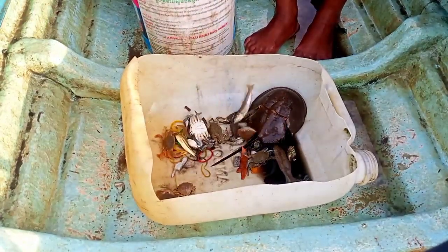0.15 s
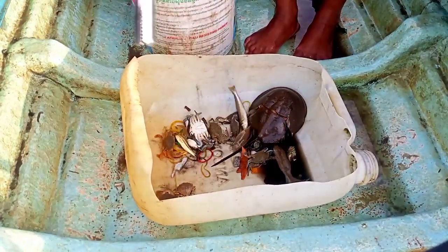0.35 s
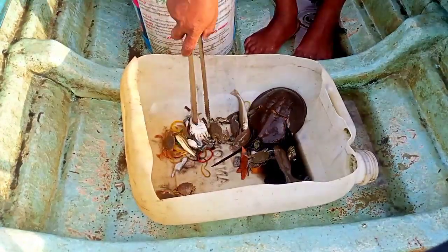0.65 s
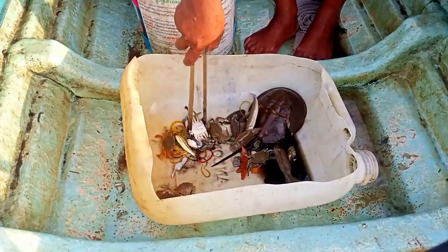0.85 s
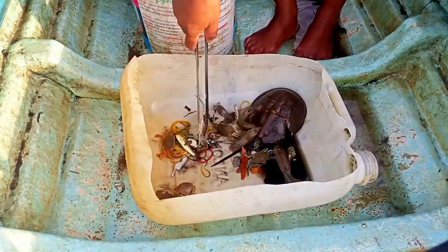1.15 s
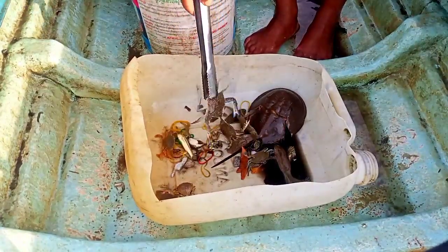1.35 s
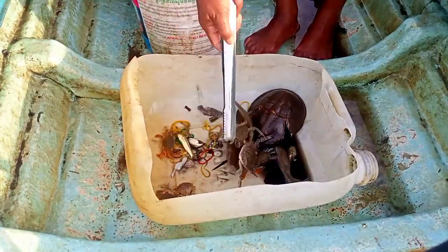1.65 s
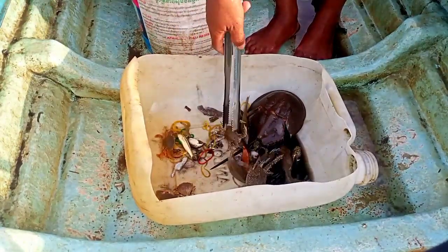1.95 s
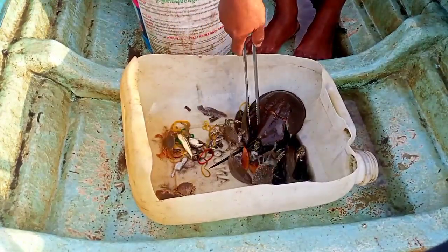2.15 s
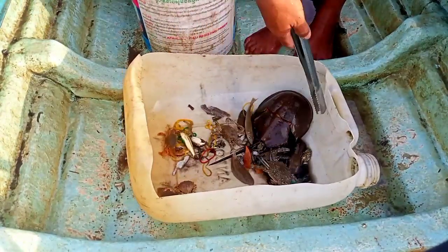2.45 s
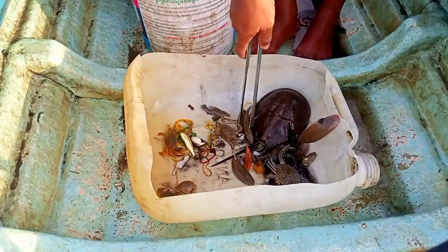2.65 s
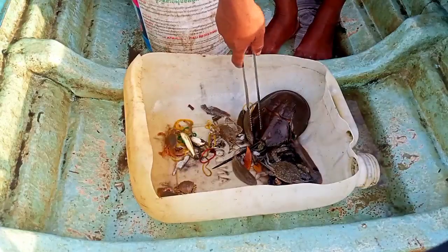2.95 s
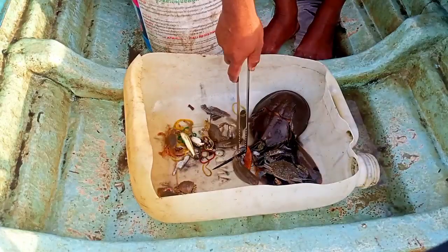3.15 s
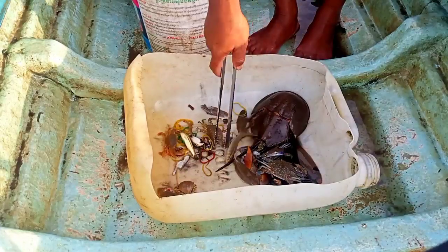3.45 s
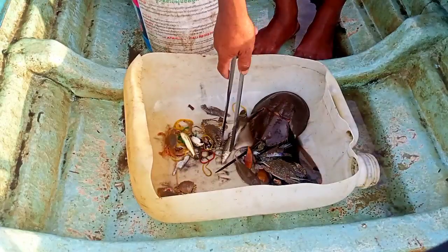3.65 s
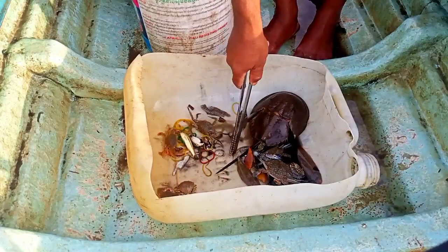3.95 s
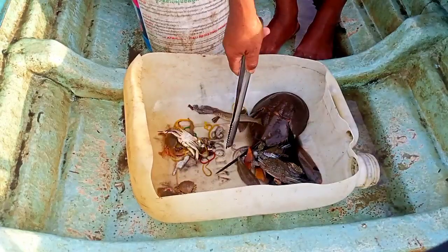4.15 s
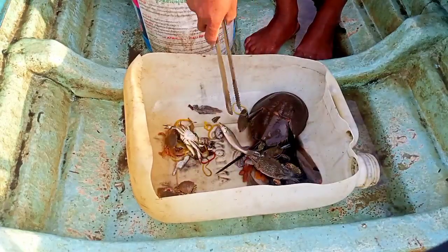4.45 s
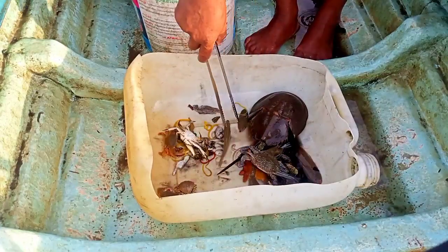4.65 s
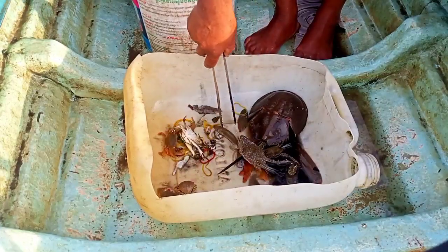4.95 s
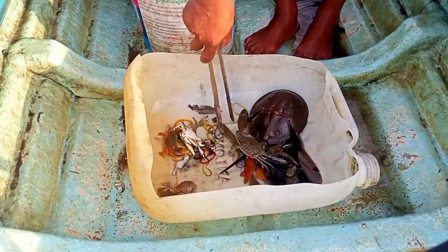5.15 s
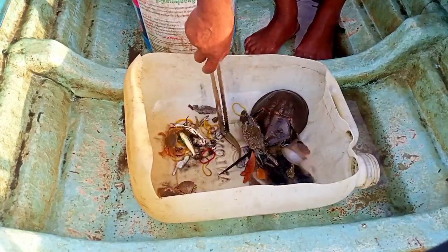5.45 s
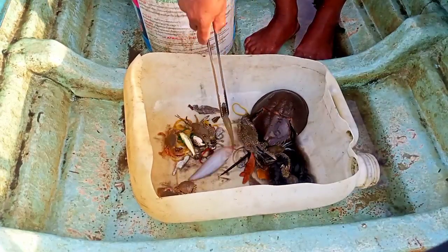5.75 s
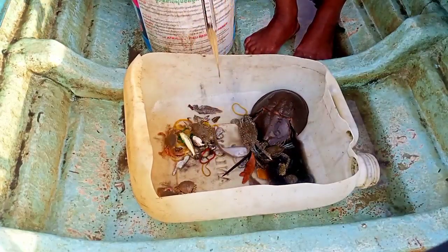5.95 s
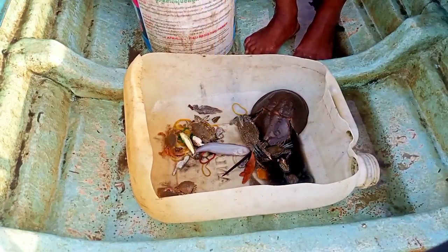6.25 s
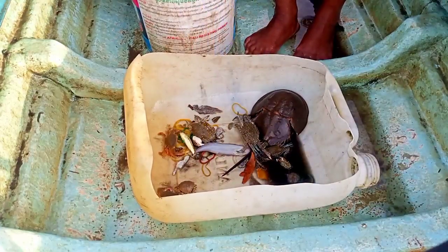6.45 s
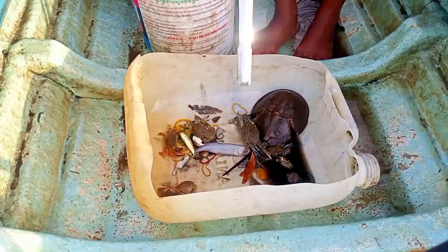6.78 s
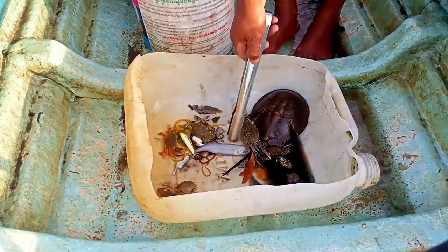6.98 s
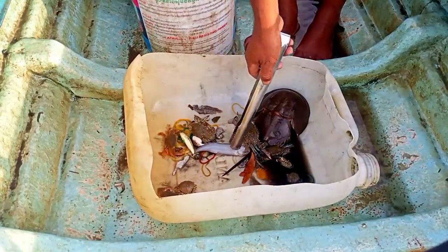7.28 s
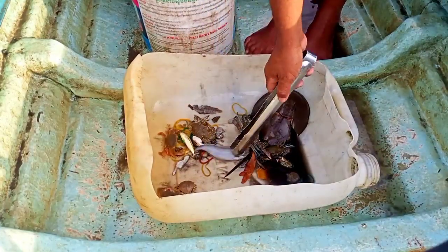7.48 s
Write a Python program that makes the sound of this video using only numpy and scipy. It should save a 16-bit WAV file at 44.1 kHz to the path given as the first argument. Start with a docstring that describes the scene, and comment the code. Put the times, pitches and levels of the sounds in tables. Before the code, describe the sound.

Close, uneven clatter of a catch being pushed around a plastic tub aboard a small boat. Shells knock against the walls and floor, the heaviest hits giving a brief hollow boom, while claws tick and scrape and steel tongs close with sharp clicks. Low wind rumble and a few dull bumps hit the microphone over a faint wash of water. The last knocks are lighter and sparser.

```python
"""Sorting a catch on a small boat

Metal tongs sort shells, crabs and fish in a cut-open plastic tub on the floor of a boat.
Each knock is a short rattle of tiny hits that rings the tub; the heaviest make the air in it boom.
In between, the catch scrapes over the plastic, small shells click and the steel tongs snap shut.
Wind hits the microphone in low thumps, water washes faintly along the hull, and dull bumps sound."""
import sys
import numpy as np
from scipy import signal
from scipy.fft import rfft, irfft, next_fast_len
from scipy.io import wavfile
from scipy.ndimage import uniform_filter1d

SR = 44100
rng = np.random.default_rng(int(sys.argv[2]) if len(sys.argv) > 2 else 0)


def unload_audio(sound):
    """Save the sound as a 16-bit wav file, at the path given as the first command line argument."""
    columns = np.transpose(np.atleast_2d(sound))
    # keep every value between -1 and 1, then stretch to whole-number steps
    steps = np.round(np.clip(columns, -1, 1) * 32767)
    wavfile.write(sys.argv[1], SR, steps.astype(np.int16))


N = 336042


def gain(db):
    """Turn decibels into a number to multiply by."""
    return 10 ** (np.asarray(db) / 20)


def unit_level(x):
    """Scale a sound to an average (rms) level of 1."""
    return x / np.sqrt(np.mean(x ** 2))


def set_peak(x, db):
    """Scale a sound so that its peak is at db."""
    return x * gain(db) / np.max(np.abs(x))


def curves(table):
    """Join the rows of a time table with straight lines, one curve per column."""
    times, *columns = np.transpose(table)
    return [np.interp(np.arange(N) / SR, times, column) for column in columns]


def keep_band(x, kind, hz, order=4):
    """Keep the "low", "high" or middle "band" pitches; a higher order cuts more sharply."""
    return signal.sosfilt(signal.butter(order, hz, kind, fs=SR, output="sos"), x)


def colour(x, spectrum):
    """Turn pitches up or down by rows of (pitch_hz, level_db)."""
    hz, db = np.transpose(spectrum)
    size = next_fast_len(len(x))
    bin_hz = np.maximum(np.arange(size // 2 + 1) * SR / size, 1)
    bin_db = np.interp(np.log(bin_hz), np.log(hz), db, left=-90, right=-90)
    return irfft(rfft(x, size) * gain(bin_db), size)[:len(x)]


def wander(per_s):
    """A smooth random curve that heads for a new value per_s times a second."""
    hold = int(SR / per_s)
    steps = np.repeat(rng.standard_normal(N // hold + 1), hold)
    return unit_level(uniform_filter1d(uniform_filter1d(steps, hold), hold)[:N])


def tiny_hits(size, per_s, spread_db):
    """Tiny pushes and pulls of uneven strength at random moments."""
    when, side, strength = rng.random((3, size))
    return (when < per_s / SR) * np.sign(side - .5) * gain(-spread_db * np.log(1 - .995 * strength))


def ring(tones, detune, extra_db, t):
    """The tones of a struck object; each falls by 60 dB in its ring_s."""
    hz, db, ring_s = np.transpose(tones)[:, :, None]
    phase = 2 * np.pi * hz * (1 + detune[:, None]) * t
    fade = np.exp(-np.log(1000) * t / np.maximum(ring_s, .01))
    return np.sum(gain(db + extra_db[:, None]) * fade * np.sin(phase), axis=0)


# Tones of the tub's floor, before the catch muffles them: pitch_hz, level_db, ring_s
FLOOR_TONES = [(623.4, 1, 0.27), (641.4, 6, 0.17), (789, 1.5, 0.093)]


def tub_floor(t):
    """The floor rings when hit at one spot; the load shifts and muffles its tones."""
    detune, scatter = rng.standard_normal((2, len(FLOOR_TONES)))
    return np.exp(-t / .013) * ring(FLOOR_TONES, 0.032 * detune, 3.1 * scatter, t)


# Tones of the tub's walls, before the catch muffles them: pitch_hz, level_db, ring_s
WALL_TONES = [(879, -4.5, 0.29), (1030, 9, 0.7), (1170, 4, 0.16), (1400, 6, 0.19), (1600, 6.5, 0.087),
              (1800, 7, 0.21), (2000, 10, 0.067), (2277, 6.5, 0.084), (2545, 10, 0.045), (2900, 6.5, 0.041)]
# Bright crackle of hard edges, as coloured by the microphone: pitch_hz, level_db
CRACK_COLOUR = [(2500, 4), (3500, 4.5), (4500, -5.5), (5600, -10), (7300, -10), (8000, 0.5), (9100, -4),
                (9800, -12), (12100, -18), (15000, -19), (15800, -10), (16200, -31)]
# How hard the catch is dragged: time_s, level_db, grit_db (added to level_db)
DRAGGING = [(0.0, -53.5, -7), (0.15, -59, -8), (0.74, -72.5, -7), (0.91, -56.5, -14), (1.29, -44.5, -5),
            (1.66, -65.5, 0), (1.93, -46, -9), (2.63, -46, -20), (2.97, -58, -8.5), (4.05, -50.5, -7.5),
            (4.18, -53.5, -4.5), (4.37, -53.5, -35), (4.58, -59.5, -7), (5.14, -44.5, -10.5),
            (5.3, -53.5, -12.5), (5.82, -48, -9.5), (6.47, -68.5, -10.5), (7.62, -62, -16)]


def scrape():
    """Shells slip over the plastic in uneven spurts; their wet weight deadens the tub."""
    level_db, grit_db = curves(DRAGGING)
    t = np.arange(SR // 20) / SR
    # hard dragging jerks, light stirring is more even
    spurts = gain(np.clip(.2 * (level_db + 70), 2, 4) * wander(45))
    slips = unit_level(tiny_hits(N, per_s=2500, spread_db=2) * spurts) * gain(level_db)
    push = keep_band(slips, "low", 3800)
    muffle = np.exp(-t / 0.0027)
    boom = unit_level(muffle * tub_floor(t)) / np.sqrt(len(t))
    tub = signal.oaconvolve(push, gain(-11) * boom)[:N]
    # the drag moves around, so now one wall tone sings out, now another
    for tone in WALL_TONES:
        wall = muffle * ring([tone], np.zeros(1), np.full(1, -26.), t)
        tub += signal.oaconvolve(push * gain(4.16 * wander(14)), wall)[:N]
    # claws and legs tick, each size at its own pitch
    ticks = np.zeros(N)
    tick_shape = np.minimum(t / 0.00054, 1) * np.exp(-t / 0.0025)
    for hz in np.geomspace(3000, 14000, num=10):
        claw = keep_band(rng.standard_normal(len(t)), "band", (hz / 1.04, hz * 1.04), order=1)
        ticks += signal.oaconvolve(tiny_hits(N, per_s=50, spread_db=3.6), claw * tick_shape)[:N]
    wet_hiss = gain(-8) * rng.standard_normal(N)
    grit = colour(unit_level(ticks) + wet_hiss, CRACK_COLOUR) * spurts
    return keep_band(tub, "high", 260, order=2) + unit_level(grit) * gain(level_db + grit_db)


# Wind pressure on the microphone between strong swirls: time_s, level_db
WIND_PRESSURE = [(0.0, -53.5), (0.95, -45), (1.04, -50.5), (2.4, -58), (2.55, -43.5), (3.71, -49),
                 (4.29, -36), (4.63, -52.5), (5.5, -56), (5.82, -45), (6.18, -43), (6.32, -51),
                 (7.17, -60.5), (7.62, -59)]
# The deep sound of swirling air: pitch_hz, level_db
RUMBLE_COLOUR = [(15, -14), (25, -11.5), (71, 1), (134, 0), (168, -4), (211, -12.5), (394, -31),
                 (470, -71.5), (500, -31), (650, -45.5), (1100, -120)]
# Single low thumps, mostly wind; one is the thud of a knock: middle_s, level_db, pitch_hz
LOW_THUMPS = [(0.206, -26.5, 93), (0.426, -34.5, 88), (0.819, -28, 129), (1.328, -28.5, 217),
              (1.429, -28.5, 79), (1.521, -33, 118), (1.68, -30.5, 182), (1.767, -29, 156),
              (1.937, -24.5, 131), (2.355, -24.5, 129), (2.407, -26.5, 121), (2.9, -30.5, 99),
              (2.99, -23.5, 131), (3.031, -29, 111), (3.934, -32, 105), (3.977, -28.5, 148),
              (4.135, -26.5, 118), (4.17, -22, 131), (4.194, -16, 134), (4.224, -22.5, 133),
              (4.259, -14, 180), (4.299, -17, 135), (4.407, -18, 149), (4.569, -29.5, 102),
              (4.906, -23.5, 123), (4.94, -19.5, 102), (4.98, -26, 122), (5.034, -16, 111),
              (5.163, -24, 131), (5.279, -27, 86.5), (5.318, -31.5, 95), (5.4, -27.5, 125),
              (5.456, -27, 129), (5.486, -29, 128), (5.544, -16, 114), (5.674, -21.5, 94),
              (5.711, -27, 141), (6.019, -22.5, 99), (6.169, -25.5, 98), (6.227, -29, 110),
              (7.354, -26.5, 88), (7.61, -27.5, 100)]


def wind():
    """Swirling air rumbles on the microphone; the rumble swells around each low thump."""
    rumble = colour(tiny_hits(N, per_s=200, spread_db=3), RUMBLE_COLOUR)
    power = uniform_filter1d(uniform_filter1d(rumble ** 2, size=2000), size=2000)
    even_rumble = rumble / np.sqrt(power + 1e-18)
    lead = SR // 5
    t = np.arange(-lead, lead) / SR
    thumps, stirred_power = np.zeros((2, N + len(t)))
    rise_s, fade_s = 0.027, 0.032
    stir = np.exp(np.where(t < 0, t / rise_s, -t / fade_s))
    for middle_s, db, hz in LOW_THUMPS:
        shape = np.exp(-(t * hz / 0.73) ** 2)  # about one and a half waves long
        i = int(middle_s * SR)
        thumps[i:i + len(t)] += gain(db) * shape * np.cos(2 * np.pi * (hz * t + rng.random()))
        stirred_power[i:i + len(t)] += (gain(db - 7.5) * stir) ** 2
    heard = slice(lead, lead + N)
    breeze = gain(curves(WIND_PRESSURE)[0] + 3 * wander(14))
    pressure = np.sqrt(breeze ** 2 + stirred_power[heard])
    return keep_band(thumps[heard] + even_rumble * pressure, "high", 52)


# Faint wash of water, with the microphone's steady high hiss: pitch_hz, level_db
WASH_AND_HISS = [(35, 0), (60, -0.5), (160, 23), (458, -0.5), (607, 20), (698, -7), (1310, -15.5),
                 (1950, -13.5), (2900, -9), (5720, -19.5), (8510, -24), (10000, -30.5), (16000, -23)]


def water_and_hiss():
    """Water washes faintly and the microphone hisses; low and high parts swell separately."""
    wash = np.zeros(N)
    for centre_hz in 90 * 2. ** np.arange(8):
        band = [(hz, db - 12 * np.log2(hz / centre_hz) ** 2) for hz, db in WASH_AND_HISS]
        wash += colour(rng.standard_normal(N), band) * gain(2.5 * wander(9))
    return unit_level(wash) * gain(-63)


def tub_walls(wall_hz, t):
    """The walls ring at one spot; the wet load muffles them and pulls the nearest tone to wall_hz."""
    hz = np.array(WALL_TONES)[:, 0]
    drift, scatter = rng.standard_normal((2, len(hz)))
    gap = np.log(hz / wall_hz)
    nearest = np.abs(gap) == np.abs(gap).min()
    detune = np.where(nearest, wall_hz / hz - 1, 0.058 * drift)
    # tones near wall_hz are strong; a small hard hit barely rings those far below
    extra_db = 2.5 * scatter + 4 * np.exp(-(gap / 0.36) ** 2) + 6 * np.minimum(gap, 0)
    return np.exp(-t / .0038) * ring(WALL_TONES, detune, extra_db, t)


def skid(hits, make_ring, spots=3, stay_s=.007):
    """The hits skid between a few spots, and each spot rings in its own way."""
    stay = int(stay_s * SR)
    spot = np.repeat(rng.integers(0, spots, len(hits) // stay + 1), stay)[:len(hits)]
    return sum(signal.fftconvolve(hits * (spot == k), make_ring())[:len(hits)] for k in range(spots))


# Knocks on the tub: start_s, wall_db, floor_db, wall_hz, crack_db, fade_s
TUB_KNOCKS = [(0.045, -23, -53, 2380, -39, 0.042), (0.08, -18, -13, 790, -54, 0.0062),
              (0.114, -15.5, -24, 830, -61, 0.0023), (0.329, -32, -40.5, 1800, -61, 0.0065),
              (0.371, -33, -62, 2900, -40, 0.0086), (0.417, -31.5, -54, 2000, -58, 0.023),
              (0.618, -30, -63, 2620, -70, 0.0079), (0.737, -17, -22, 1054, -36, 0.023),
              (0.788, -21.5, -26.5, 1020, -47, 0.034), (0.815, -26.5, -25.5, 1400, -50, 0.032),
              (0.87, -20.5, -50, 880, -43, 0.0095), (0.923, -21, -18, 1400, -47, 0.014),
              (1.039, -39, -27, 2210, -35, 0.026), (1.07, -36, -32, 3550, -37, 0.014),
              (1.096, -24, -48, 2240, -30.5, 0.013), (1.179, -40, -43, 2240, -58, 0.0092),
              (1.248, -23, -36, 1010, -40, 0.017), (1.297, -9, -23, 3250, -13.5, 0.015),
              (1.315, -5, -9, 963, -18, 0.011), (1.378, -14.5, -30, 2000, -54, 0.0054),
              (1.396, -25.5, -47, 1770, -29.5, 0.013), (1.42, -27.5, -36, 1730, -28.5, 0.011),
              (1.457, -30.5, -39.5, 1690, -27.5, 0.0082), (1.48, -35, -43, 2000, -32, 0.0046),
              (1.558, -20.5, -42, 2470, -47, 0.0048), (1.743, -16.5, -41, 2120, -34, 0.015),
              (1.752, -9, -18.5, 965, -32.5, 0.017), (1.85, -20, -34, 1680, -34.5, 0.0069),
              (1.91, -9.5, -11.5, 1930, -30, 0.0076), (1.94, -23, -24, 2800, -30.5, 0.012),
              (2.002, -58, -57, 3000, -28, 0.0097), (2.014, -11, -28, 2000, -34, 0.0056),
              (2.065, -26, -35, 1010, -40.5, 0.017), (2.153, -29, -26, 1880, -47, 0.045),
              (2.174, -24, -38, 970, -40, 0.021), (2.2, -12, -61, 870, -50, 0.0041),
              (2.256, -25, -48, 3020, -30, 0.015), (2.309, -19.5, -26, 1040, -49, 0.0046),
              (2.338, -13.5, -66, 1000, -38, 0.0038), (2.47, -17, -26, 1640, -41.5, 0.02),
              (2.509, -14.5, -24, 1170, -25, 0.046), (2.535, -12, -21, 1480, -17.5, 0.016),
              (2.628, -1.5, -11.5, 2030, -14, 0.0067), (2.716, -25.5, -42, 1410, -41, 0.016),
              (2.752, -27, -32, 2000, -62, 0.0077), (2.815, -23, -27, 1170, -46, 0.029),
              (2.96, -31.5, -38, 2000, -59, 0.063), (3.093, -38, -22, 1030, -65, 0.011),
              (3.254, -21, -26.5, 1120, -44, 0.019), (3.308, -22, -33.5, 1875, -27.5, 0.019),
              (3.329, -21.5, -27, 1040, -48, 0.019), (3.442, -8.5, -25, 1800, -37.5, 0.0094),
              (3.515, -28.5, -57, 1800, -55, 0.023), (3.558, -29.5, -37.5, 850, -44, 0.035),
              (3.947, -4.5, -56, 2100, -33, 0.0075), (3.964, -10.5, -13.5, 2134, -25, 0.013),
              (3.989, -30, -40, 3000, -29, 0.0097), (4.005, -7.5, -13.5, 1070, -47, 0.0076),
              (4.037, -15.5, -41, 2190, -37, 0.017), (4.059, -2, -11.5, 1930, -31.5, 0.011),
              (4.132, -17.5, -32.5, 1530, -35.5, 0.013), (4.172, -5, -14.5, 2530, -27, 0.0075),
              (4.19, -7, -21.5, 2000, -10.5, 0.0054), (4.273, -14, -27, 850, -21.5, 0.014),
              (4.375, -25.5, -43, 1250, -27, 0.0084), (4.59, -28, -31.5, 2000, -51, 0.022),
              (4.614, -22.5, -33.5, 1080, -47, 0.0087), (4.651, -31, -39, 1030, -54, 0.13),
              (4.8, -25, -60, 2260, -36, 0.0061), (4.874, -31, -52, 1010, -34, 0.032),
              (4.943, -16.5, -42, 1030, -30, 0.017), (5.001, -2, -18.5, 1600, -31.5, 0.0059),
              (5.031, -15.5, -19, 970, -47.5, 0.014), (5.113, -13, -22.5, 2380, -38, 0.01),
              (5.131, -13, -31, 1090, -51, 0.0086), (5.163, -20.5, -29, 2900, -37, 0.012),
              (5.191, -21, -32, 2000, -55, 0.015), (5.247, -45, -54, 2900, -35, 0.0023),
              (5.29, -19.5, -62, 795, -39, 0.039), (5.376, -30, -40, 1020, -34, 0.005),
              (5.49, -30, -39, 1050, -42, 0.02), (5.534, -27.5, -29, 860, -41, 0.035),
              (5.566, -24.5, -29.5, 1800, -46, 0.035), (5.721, -25, -31.5, 2260, -40, 0.016),
              (5.808, -24, -61, 1740, -36.5, 0.0075), (5.934, -30, -41, 2900, -61, 0.013),
              (5.968, -9.5, -14, 910, -21.5, 0.013), (6.025, -24.5, -27.5, 1060, -51, 0.0072),
              (6.262, -30, -66, 2020, -51, 0.021), (6.306, -31, -64, 2820, -50, 0.023),
              (6.511, -40, -64, 2810, -56, 0.017), (6.619, -35, -51, 2500, -67, 0.0039),
              (6.637, -30, -38, 1075, -65, 0.0093), (6.656, -25, -46, 1430, -45, 0.0065),
              (6.683, -22.5, -37, 1600, -47, 0.0082), (6.8, -35, -72, 2000, -54, 0.0041),
              (7.417, -16.5, -15.5, 1950, -38.5, 0.0065), (7.442, -32, -24, 2760, -53, 0.0096),
              (7.594, -48, -36, 810, -52, 0.021)]


def knocks():
    """A first blow and a short rattle ring the tub's walls and floor; shell edges add a crack."""
    t = np.arange(SR // 7) / SR
    out = np.zeros(N + len(t))
    for start_s, wall_db, floor_db, wall_hz, crack_db, fade_s in TUB_KNOCKS:
        slips = tiny_hits(len(t), per_s=6000, spread_db=2)
        # long rattles are scratches: they swell in and have a weak first blow
        rise_s = 0.0033 + 0.18 * max(fade_s - 0.018, 0)
        fade = np.exp(-(t / fade_s) ** 0.98) + gain(-34.5) * np.exp(-t / 0.016)
        shape = np.minimum(t / rise_s, 1) * fade
        rattle = slips * shape
        rattle[int(.0006 * SR)] += 2.96 * np.exp(-(fade_s / 0.052) ** 2)
        # the plastic gives way, pushing too slowly for high pitches
        walls = skid(keep_band(rattle, "low", 3570), lambda: tub_walls(wall_hz, t[:len(t) // 4]))
        # the heavy floor shakes for longer than the walls, so the knock ends lower
        late_shake = 0.74 * slips * np.minimum(t / 0.0091, 1) * np.exp(-t / (2 * fade_s))
        floor = skid(keep_band(rattle + late_shake, "low", 797), lambda: tub_floor(t))
        edges = colour(tiny_hits(len(t), per_s=9000, spread_db=2.37), CRACK_COLOUR)
        crack = edges * shape * np.minimum(t / 0.0037, 1)
        i = int(start_s * SR)
        for part, db in (floor, floor_db), (walls, wall_db), (crack, crack_db):
            out[i:i + len(t)] += set_peak(part, db)
    return keep_band(out[:N], "high", 270)  # the knocks carry no deep bass


# Soft, dull low bumps, on the hull or the hollow upper part of wind thumps: start_s, peak_db, length_s
DULL_BUMPS = [(0.123, -30, 0.028), (4.238, -22, 0.021), (4.405, -36.5, 0.035), (4.476, -32.5, 0.23),
              (5.447, -45, 0.058), (6.643, -23, 0.044), (6.693, -34.5, 0.041), (6.955, -38, 0.06),
              (7.231, -42.5, 0.063)]


def dull_bumps():
    """Each bump is a short, hollow swell of low noise."""
    t = np.arange(SR // 5) / SR
    out = np.zeros(N + len(t))
    for start_s, peak_db, length_s in DULL_BUMPS:
        swell = np.sin(np.pi * np.minimum(t / length_s, 1))
        bump = keep_band(rng.standard_normal(len(t)) * swell, "band", (185, 420), order=2)
        i = int(start_s * SR)
        out[i:i + len(t)] += set_peak(bump, peak_db)
    return out[:N]


# Clicks of single small shells: start_s, peak_db, pitch_hz
SHELL_CLICKS = [(0.244, -43, 2000), (0.559, -39.5, 4660), (.572, -43, 2900), (4.828, -43, 8300),
                (5.778, -54, 6200), (5.931, -41, 4500), (6.828, -56, 4450), (6.841, -43.5, 2000),
                (6.901, -45, 4400), (7.128, -56, 8000)]


def shell_clicks(ring_waves=24):
    """A few tiny hits make a small shell ring briefly at its own pitch."""
    t = np.arange(SR // 20) / SR
    out = np.zeros(N + len(t))
    for start_s, peak_db, hz in SHELL_CLICKS:
        touch = tiny_hits(len(t), per_s=3000, spread_db=2.3) * np.exp(-t / 0.0095)
        shell = np.exp(-np.log(1000) * t * hz / ring_waves) * np.sin(2 * np.pi * hz * t)
        i = int(start_s * SR)
        out[i:i + len(t)] += set_peak(signal.fftconvolve(touch, shell)[:len(t)], peak_db)
    return out[:N]


# Booms of the air in the tub: start_s, peak_db
AIR_BOOMS = [(0.747, -27.5), (1.325, -24.5), (1.92, -34), (2.635, -21.5), (3.969, -27.5), (4.01, -32.5),
             (4.067, -22.5), (5.009, -27.5), (5.975, -30.5)]


def air_booms(end_hz=350.3, rise_s=0.0082, ring_s=0.23):
    """After a heavy blow the air in the tub rings low, sinking in pitch as it dies away."""
    t = np.arange(SR // 5) / SR
    out = np.zeros(N + len(t))
    swell = np.minimum(t / rise_s, 1) ** 2 * np.exp(-np.log(1000) * t / ring_s)
    bent_time = t + 0.0053 * (1 - np.exp(-t / 0.021))  # runs fast at first, raising the pitch
    for start_s, peak_db in AIR_BOOMS:
        detune, phase = rng.random(2)
        hz = end_hz * (1 + 0.017 * (detune - .5))
        boom = swell * np.sin(2 * np.pi * (hz * bent_time + phase))
        i = int(start_s * SR)
        out[i:i + len(t)] += set_peak(boom, peak_db)
    return out[:N]


# Low tones of the steel arms, which the grip shifts: pitch_hz, level_db, ring_s
LOW_ARM_TONES = [(1600, 4, 0.023), (1680, -3, 0.026)]
# High tones of the steel arms: pitch_hz, level_db, ring_s
HIGH_ARM_TONES = [(2380, -13, 0.046), (3250, 6, 0.024), (4020, -19.5, 0.02), (5480, -15.5, 0.012)]
# The tongs snap shut: start_s, low_db, low_hz, high_db, crack_db, rise_s, fade_s
TONG_SNAPS = [(1.561, -41, 1800, -14, -26, 0.0045, 0.006), (1.637, -52.5, 1800, -45, -30.5, .005, 0.0086),
              (1.664, -21.5, 1650, -32, -20, 0.0034, 0.0081),
              (1.671, -7.5, 1660, -29, -7.5, 0.0098, 0.0072), (2.537, -11.5, 1570, -37, -38, 0.017, 0.0061),
              (2.564, -2.5, 1590, -18, -26, 0.0079, 0.0038), (2.582, -19, 1600, -40, -10.5, 0.0013, 0.0033),
              (4.188, -22.5, 1900, -16, -18.5, 0.0056, 0.0015),
              (4.351, -51, 1900, -14, -14, 0.0093, 0.0042)]


def tongs():
    """The steel arms grind shut, then ring briefly as the hand muffles them."""
    t = np.arange(SR // 8) / SR
    out = np.zeros(N + len(t))
    for start_s, low_db, low_hz, high_db, crack_db, rise_s, fade_s in TONG_SNAPS:
        fade = np.exp(-np.maximum(t - rise_s, 0) / fade_s) + gain(-30) * np.exp(-t / 0.012)
        shape = np.minimum(t / rise_s, 1) ** 2.5 * fade
        grind = tiny_hits(len(t), per_s=8800, spread_db=0.51) * shape
        shut = int(rise_s * SR)
        grind[shut] += 3  # the arms meet
        push = keep_band(grind, "band", (1450, 6000))
        i = int(start_s * SR)
        # a hard closing also sends a short dull knock through the hand
        out[i + shut:i + shut + 40] += gain(min(low_db, crack_db) - 10) * np.hanning(40)
        edges = colour(tiny_hits(len(t), per_s=8300, spread_db=1.9), CRACK_COLOUR)
        out[i:i + len(t)] += set_peak(edges * shape, crack_db)
        grip_shift = low_hz / LOW_ARM_TONES[0][0] - 1
        for tones, db, shift in (LOW_ARM_TONES, low_db, grip_shift), (HIGH_ARM_TONES, high_db, 0):
            detune = shift + 0.013 * rng.standard_normal(len(tones))
            arms = ring(tones, detune, np.zeros(len(tones)), t)
            out[i:i + len(t)] += set_peak(signal.fftconvolve(push, arms)[:len(t)], db)
    return out[:N]


def scene():
    """Add all the sounds into one channel."""
    sorting = knocks() + air_booms() + tongs() + shell_clicks() + scrape()
    return (sorting + wind() + water_and_hiss() + dull_bumps())[None, :]


def record(dry):
    """Cut off the very highest pitches, above 15900 Hz."""
    return signal.sosfilt(signal.ellip(8, .2, 70, 15900, fs=SR, output="sos"), dry)


dry = scene()
out = record(dry)
unload_audio(out)
```